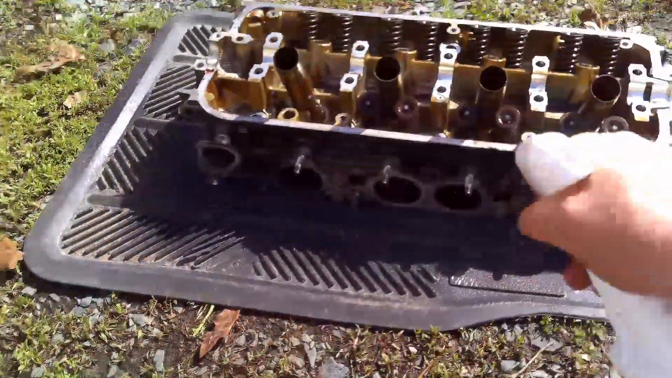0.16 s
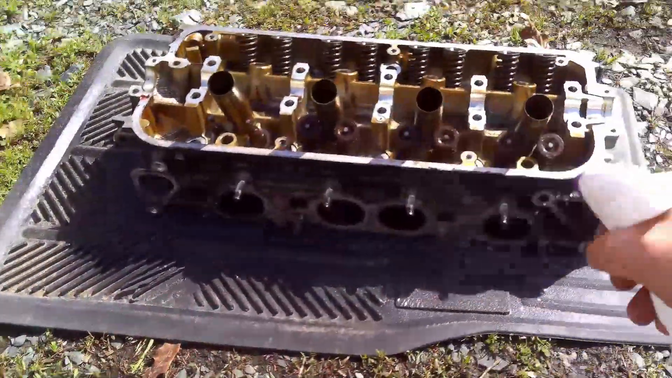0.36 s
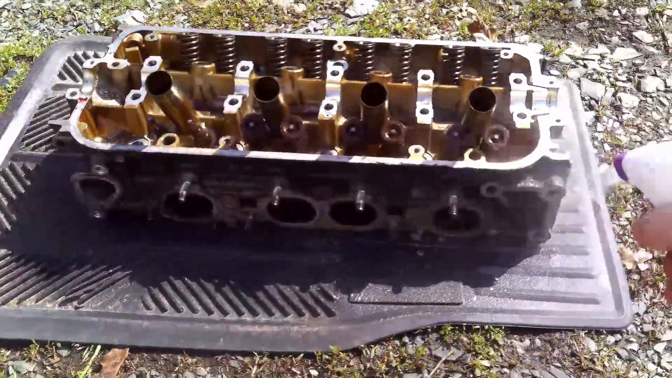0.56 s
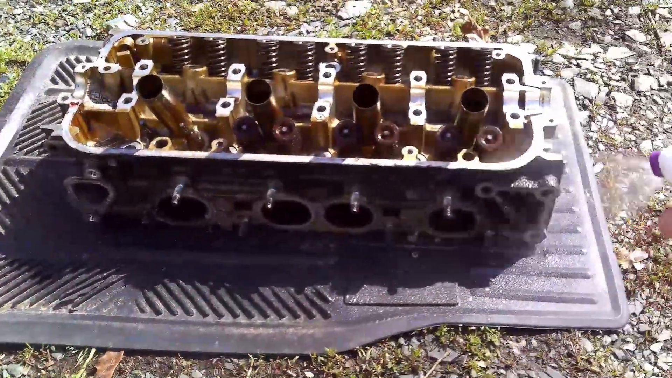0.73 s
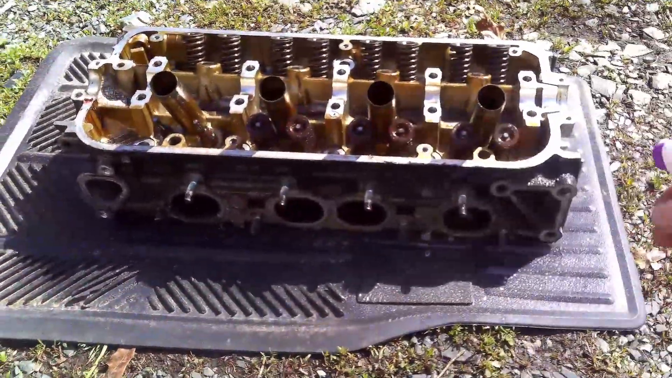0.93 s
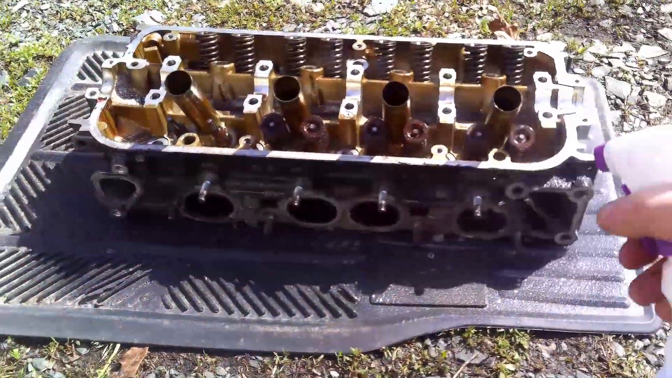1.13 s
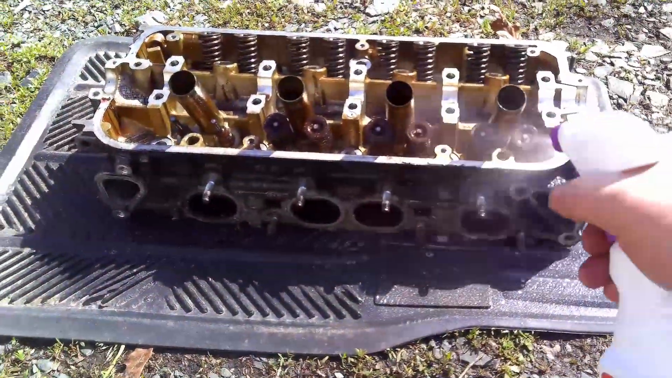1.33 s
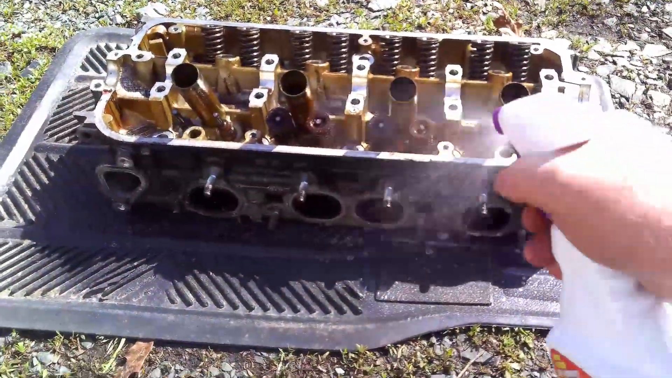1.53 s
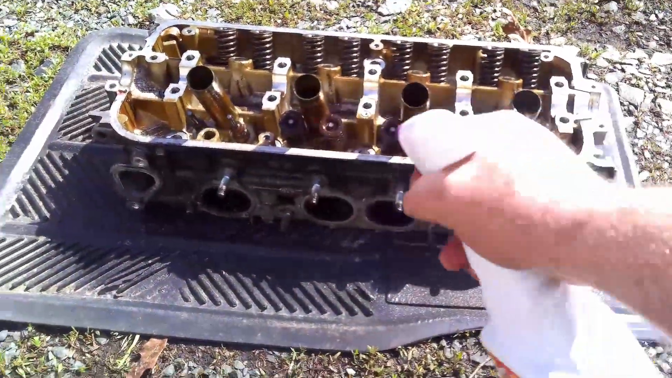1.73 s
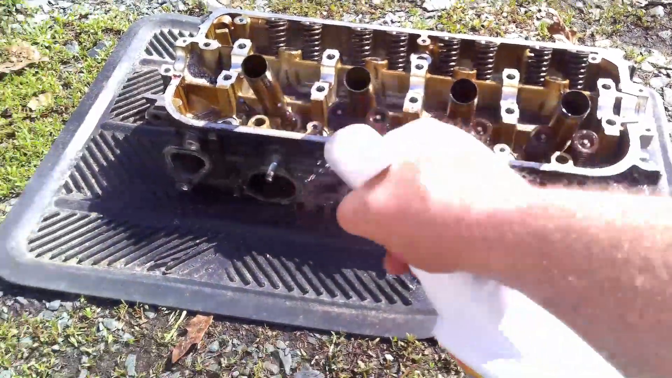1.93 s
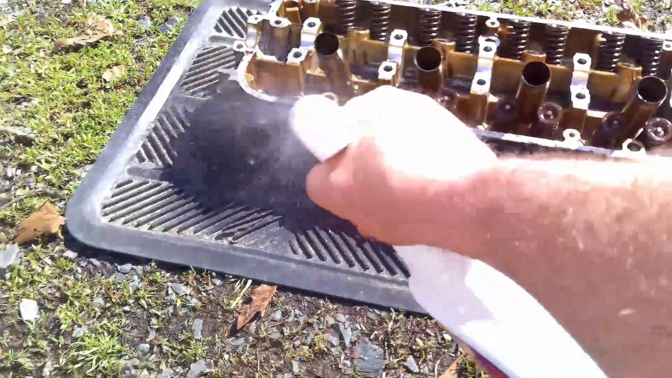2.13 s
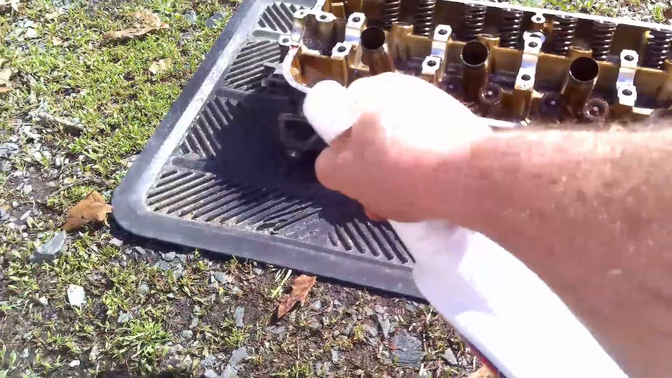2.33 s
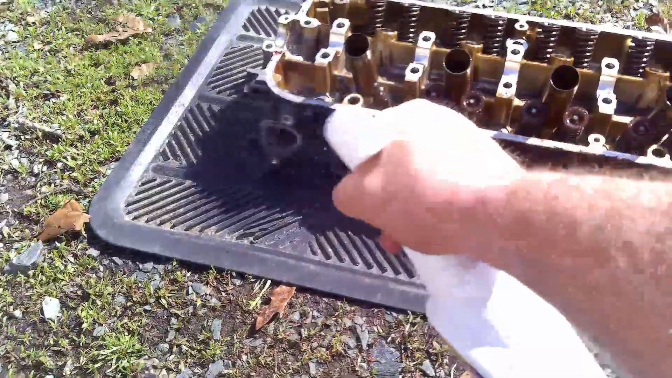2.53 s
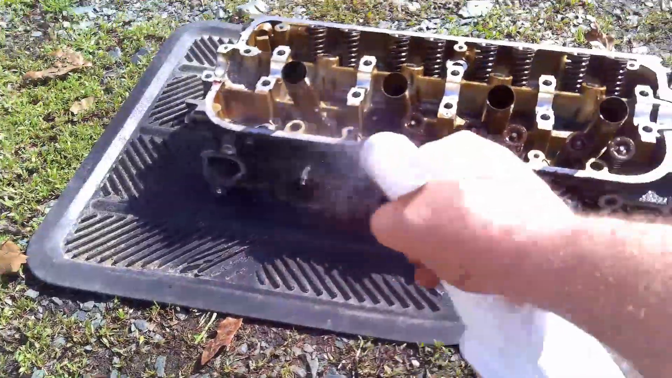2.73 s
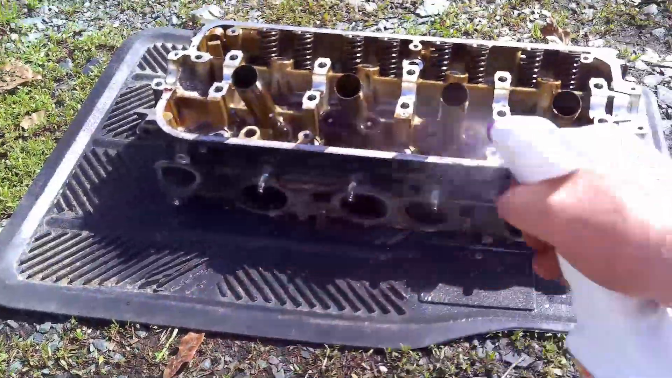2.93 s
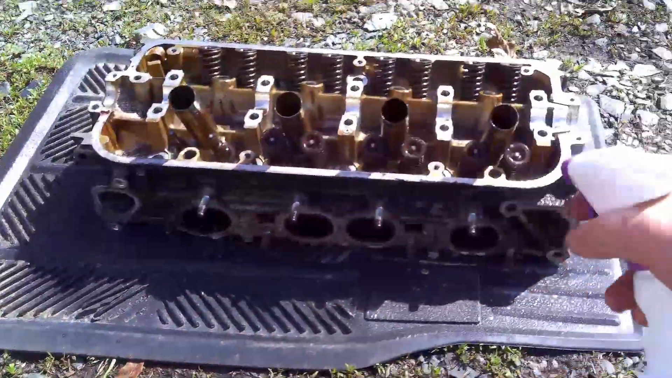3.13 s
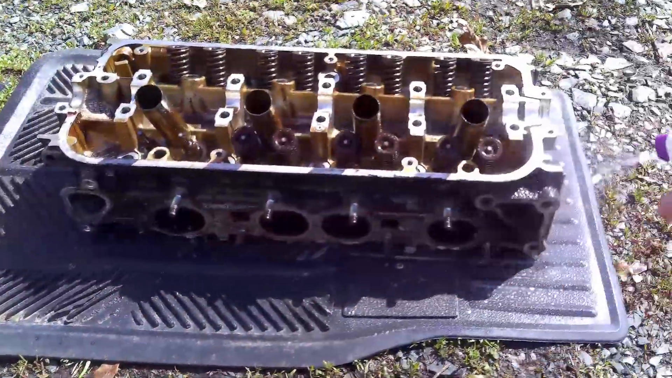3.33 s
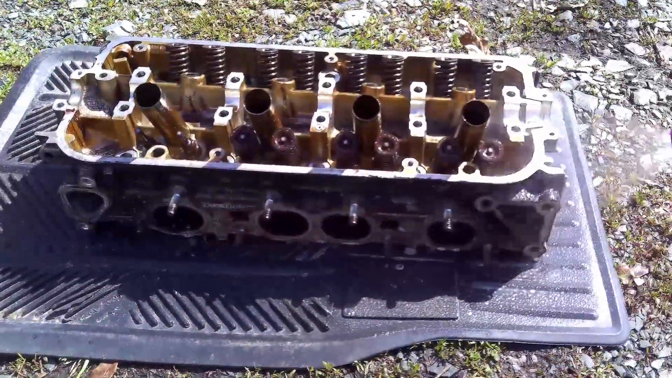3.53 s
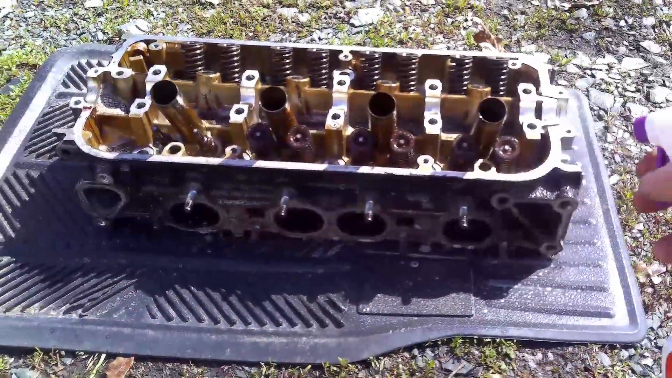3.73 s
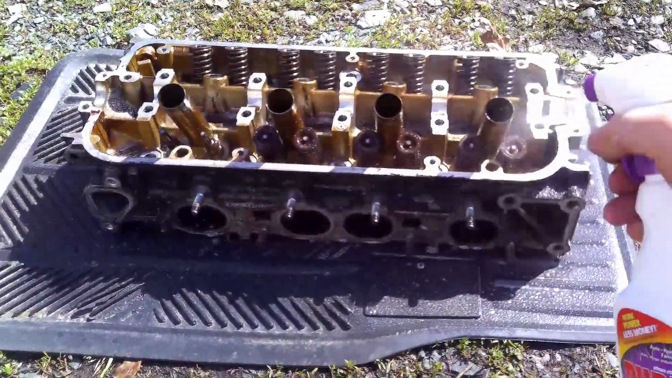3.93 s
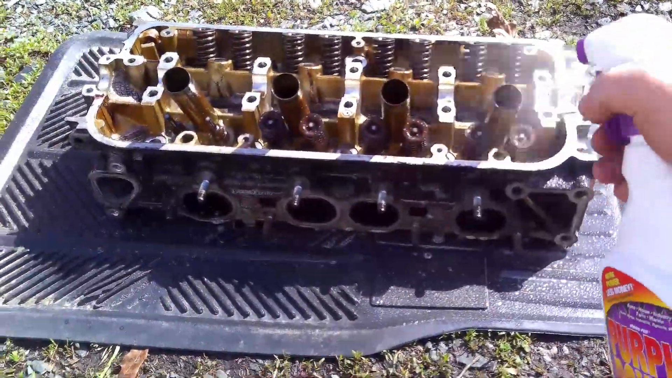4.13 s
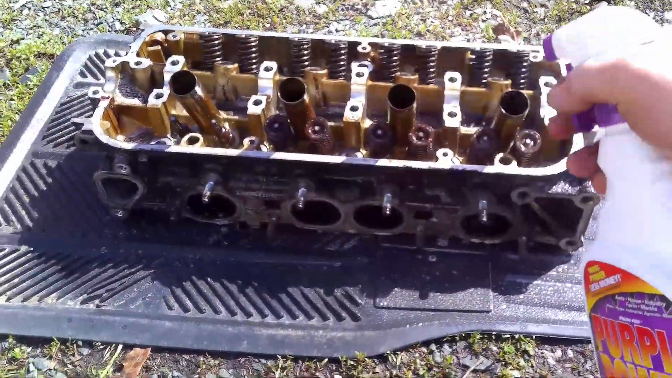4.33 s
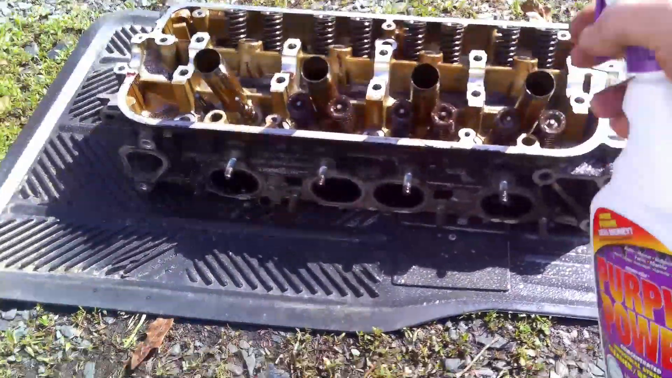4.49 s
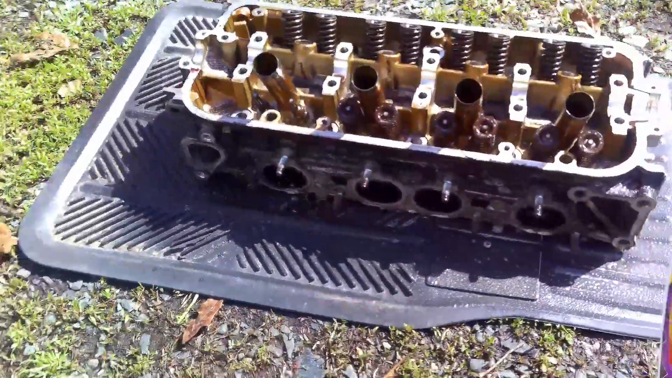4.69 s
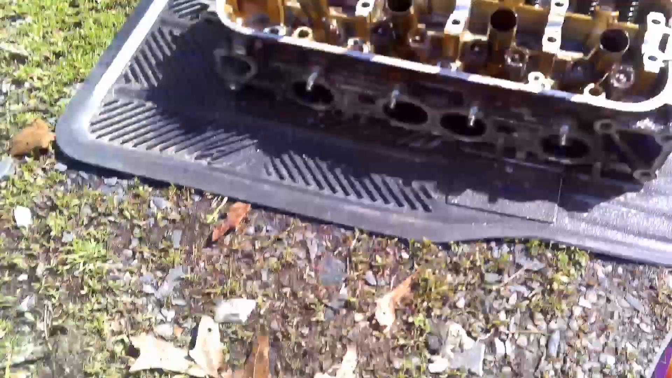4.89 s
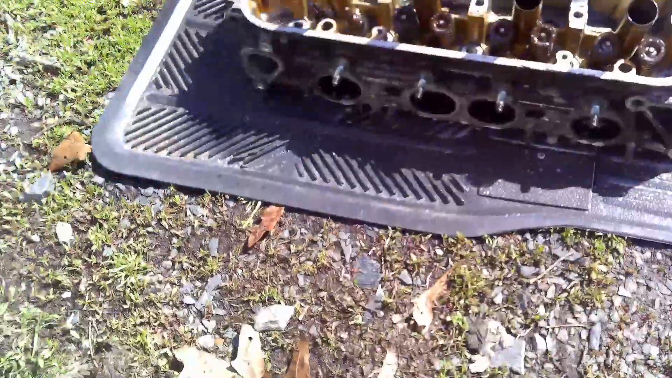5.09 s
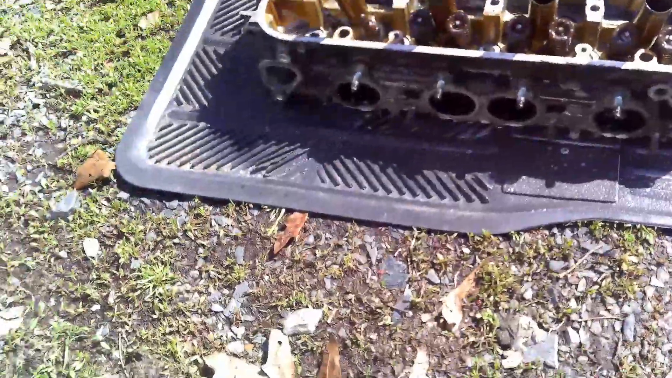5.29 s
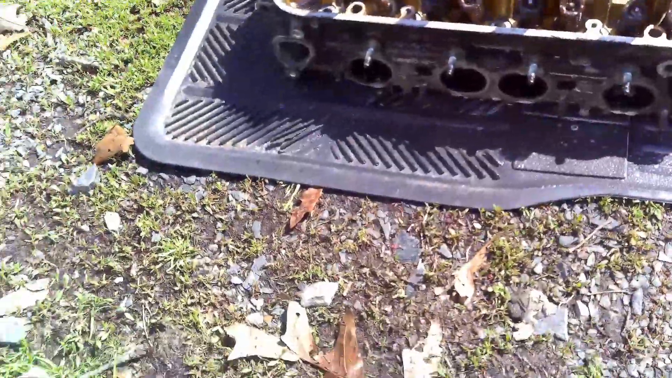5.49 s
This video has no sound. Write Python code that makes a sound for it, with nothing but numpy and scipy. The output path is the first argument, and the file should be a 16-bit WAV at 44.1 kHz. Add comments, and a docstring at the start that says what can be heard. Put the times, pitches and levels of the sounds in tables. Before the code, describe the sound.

Rapid wet squirts of a spray bottle, roughly four a second at first and slowing slightly, hiss near the microphone with rattly plastic trigger clicks between them. The spraying stops after four seconds with coarse drops on metal; then come a thin bird whistle, small glugs and a gritty footstep on stones. Outdoor air, soft wind and a far low engine hum lie beneath, left channel only.

```python
"""In a yard, a trigger spray bottle is pumped sixteen times at a metal engine part, close to one microphone.
The tail of an earlier squeeze opens the scene. Each squeeze is a swell of noise (mist) and random grains
(droplets); between squeezes the plastic trigger clacks as noise bursts in resonators and the pump refills
with a hiss. Then a bird whistles faintly (gliding sine), liquid glugs (decaying sines) and a shoe shifts on
gravel (grains and snaps). A far engine hums throughout, under filtered noise for open air and wind."""
import sys
import numpy as np
from scipy import signal
from scipy.fft import rfft, irfft, next_fast_len
from scipy.io import wavfile
from scipy.ndimage import map_coordinates

SR = 44100
rng = np.random.default_rng(int(sys.argv[2]) if len(sys.argv) > 2 else 0)


def transcribe(signal):
    """Save signal, clipped to [-1, 1], as a 16-bit WAV file at the path in sys.argv[1]."""
    frames = np.atleast_2d(signal).T
    limited = np.clip(frames, -1, 1)
    pcm = np.round(limited * 32767).astype(np.int16)
    wavfile.write(sys.argv[1], SR, pcm)


N = 244755
TIME = np.arange(N) / SR

# Pump strokes. Each row: full flow in seconds, spray level in dB, body tilt in dB, hiss tilt in dB,
# trigger release in seconds, refill level in dB before the trims of each layer.
STROKES = [(-.14, -25, 1, 0, -.018, -34), (.103, -25.5, 2.5, -.5, .243, -34),
           (.347, -23.5, 1, 0, .481, -36.5), (.583, -23.5, .5, -1, .716, -40),
           (.84, -23.5, .5, -1, .982, -36), (1.096, -24.5, 2, 1, 1.241, -35),
           (1.357, -25, 1.5, 2.5, 1.506, -36.5), (1.62, -24, 1, 1, 1.77, -41.5),
           (1.908, -23.5, 0, -2, 2.055, -42.5), (2.192, -25.5, 1.5, -1, 2.348, -45),
           (2.478, -27.5, 4.5, .5, 2.632, -41.5), (2.761, -24.5, 1.5, -1.5, 2.9, -41),
           (3.031, -25, 2, 0, 3.188, -41), (3.333, -23, -.5, -2.5, 3.494, -45),
           (3.633, -26, 1.8, 1.7, 3.786, -41), (3.934, -24.5, .8, 1, 4.094, -40.5),
           (4.243, -23.5, 1, .7, 4.403, -41.5)]
# Bright plastic click spectrum. Each row: frequency in Hz, relative density in dB per Hz.
TICK = [(600, -17), (1700, 9), (3500, -2), (5500, 6), (8000, 7), (10000, -11), (13000, -5.5), (15000, -6)]
# The shoe presses and grinds. Each row: centre in seconds, half length in seconds,
# relative grit level in dB, relative scuff level in dB.
PRESSES = [(4.93, .07, -59.5, -57.5), (5.025, .04, -51, -57), (5.118, .034, -42, -47),
           (5.245, .06, -49, -52), (5.385, .04, -57, -55), (5.535, .02, -48, -51)]
REFILL_S = .042  # the piston's way back


def amp(db):
    """Decibels to gain."""
    return 10 ** (np.asarray(db) / 20)


def unit(x):
    """x at rms 1."""
    return x / np.sqrt(np.mean(x ** 2) + 1e-20)


def curves(rows):
    """One value per sample for each column after the time."""
    s, *cols = np.transpose(rows)
    return [np.interp(TIME, s, c) for c in cols]


def wobble(rate):
    """A smooth random curve with rate knots a second."""
    knots = rng.standard_normal(int(N * rate / SR) + 4)
    return map_coordinates(knots, [TIME * rate])


def colour(x, points):
    """Causal minimum-phase filter through (Hz, dB) points on a log axis."""
    size = 2 * next_fast_len(len(x) // 2 + 1024)
    hz, db = np.transpose(points)
    bins = np.fft.rfftfreq(size, 1 / SR) + 1  # 1 Hz up, to keep the log finite
    gain = amp(np.interp(np.log(bins), np.log(hz), db))
    # folding the cepstrum puts all the energy after the impact
    cepstrum = irfft(np.log(gain))
    cepstrum[1:size // 2] *= 2
    cepstrum[size // 2 + 1:] = 0
    response = np.exp(rfft(cepstrum))
    return irfft(rfft(x, size) * response)[:len(x)]


def resonate(x, hz, width_hz):
    """One damped resonance."""
    return signal.lfilter(*signal.iirpeak(hz, hz / width_hz, SR), x)


def noise(points):
    """Coloured noise of rms 1."""
    return unit(colour(rng.standard_normal(N), points))


def grains(rate, spread_db, points):
    """Random tiny impacts, about rate a second and of uneven size, at rms 1."""
    hits = rng.random(N) < rate / SR
    sizes = amp(spread_db * np.clip(rng.standard_normal(N), -2, 2))
    return unit(colour(hits * rng.choice([-1, 1], N) * sizes, points))


def add(track, s, sound):
    """Mix a sound into the track at time s."""
    start = round(s * SR)
    sound, start = sound[max(-start, 0):], max(start, 0)
    track[start:start + len(sound)] += sound[:max(N - start, 0)]


def swells(rows):
    """Gain over time of bell-shaped swells given as (s, half length s, dB)."""
    return sum(amp(db) * np.exp(-((TIME - s) / half) ** 2) for s, half, db in rows)


def yard(base_hz=68.8, engine_db=7.5, overtone_db=-6, breeze_db=-72, gust_db=6, ambience_db=10):
    """Light wind on the microphone, open air and the hum of a far engine on two unsteady harmonics."""
    # Slow bed levels. Each row: time in seconds, ambience and engine hum in dB before trim.
    beds = [(0.0, -61, -70), (0.91, -62, -61), (1.07, -60, -72), (1.95, -64, -66), (4.27, -61, -68),
            (4.58, -68, -70), (5.19, -64, -67), (5.55, -68, -73)]
    # Gusts on the microphone. Each row: centre in seconds, half length in seconds, level in dB before trim.
    gusts = [(2.8, .02, -56), (4.6, .4, -69), (5.49, .07, -57.5)]
    # Open-air spectrum. Each row: frequency in Hz, relative density in dB per Hz.
    air = [(90, -6), (160, 2), (230, 0), (330, -5.5), (600, -2.5), (1200, -8), (2400, -10.5), (5000, -12),
           (8000, -21.5), (10500, -20.5), (15700, -18.5)]
    # Wind rumble spectrum. Each row: frequency in Hz, relative density in dB per Hz.
    rumble = [(15, 1.5), (35, -1), (80, -5.5), (200, -13), (800, -86)]
    air_db, hum_db = curves(beds)
    phase = 2 * np.pi * np.cumsum(base_hz * (1 + 0.0134 * wobble(6))) / SR
    second = amp(1.2 * wobble(7)) * np.sin(2 * phase)
    third = amp(2 * wobble(5)) * np.sin(3 * phase)
    hum = amp(hum_db + engine_db) * (second + amp(overtone_db) * third)
    wind = amp(gust_db) * (amp(breeze_db) + swells(gusts)) * noise(rumble)
    return hum + wind + amp(air_db + ambience_db) * noise(air)


def rustle():
    """A soft low rustle under the spraying: noise around 360 Hz in slow swells."""
    # Rustle swells. Each row: centre in seconds, half length in seconds, level in dB.
    rustle_swells = [(2.58, .09, -57), (4.05, .22, -55)]
    return swells(rustle_swells) * noise([(150, -22), (270, -5.5), (360, 0), (450, -8), (700, -24), (2000, -62)])


def bird(start_s=4.522, length_s=.135, base_hz=3780, arch_hz=830, level_db=-62, waver=.0077):
    """One thin, faint whistle: pitch and loudness rise and fall in one arch."""
    arch = np.sin(np.pi * np.clip((TIME - start_s) / length_s, 0, 1))
    hz = (base_hz + arch_hz * arch) * (1 + waver * wobble(200))
    return amp(level_db) * arch * np.sin(2 * np.pi * np.cumsum(hz) / SR)


def pebbles(count=2, over_grit_db=17, thud_db=-9, scatter_db=2, centre_hz=7000, spread_hz=700):
    """Small stones, as rows like the loud ones, give way at random around each press of the shoe."""
    rows = []
    for s, half, grit_db, _ in PRESSES:
        for _ in range(count):
            at = s + half * rng.uniform(-1, 1)
            db = grit_db + over_grit_db + scatter_db * rng.standard_normal()
            rows.append((at, db, thud_db, centre_hz + spread_hz * rng.uniform(-1, 1)))
    return rows


def gravel(snap_s=0.00098, snap_db=0, thud_db=3.3, delay_s=.0009, ring_db=-4, grit_db=-1, scuff_db=2.5):
    """Stones slip against each other as short ringing snaps over a bed of crunching grit."""
    # The loudest stones under the shoe. Each row: time in seconds, relative level in dB,
    # low thud in dB before trim, ring in Hz.
    stones = [(4.548, -41.5, -8.5, 4500), (4.991, -25, -30, 7000), (5.02, -12, -7, 4970),
              (5.065, -30, -14, 7160), (5.101, -13, -13, 4750), (5.105, -20, -12, 6300),
              (5.1283, -21, -13, 7100), (5.1574, -20.5, -20, 4930), (5.1962, -23, -20, 3600),
              (5.2124, -19.5, -21, 6750), (5.2396, -16.5, -18, 6500), (5.2612, -23.5, -7.5, 2600),
              (5.2929, -28, -19, 7200), (5.3226, -26, -29, 6530), (5.3728, -27, -9, 7500),
              (5.3813, -24, -10.5, 4800), (5.5269, -23, -23, 7800)]
    # Stone crunch spectrum. Each row: frequency in Hz, relative density in dB per Hz.
    crunch = [(500, -22), (2000, -3.5), (3500, 1), (5000, 5.5), (6500, 5.5), (8000, 3.5), (10000, -7),
              (15700, -22)]
    # Dull sole scuff spectrum. Each row: frequency in Hz, relative density in dB per Hz.
    sole = [(200, -20), (600, 2), (1300, 0.5), (2000, 0), (3000, -2.5), (6000, -19)]
    grit = swells([(s, half, db) for s, half, db, _ in PRESSES])
    scuff = swells([(s, half, db) for s, half, _, db in PRESSES])
    out = amp(grit_db) * grit * grains(900, 2.1, crunch)
    out += amp(scuff_db) * scuff * grains(700, 2.8, sole)
    t = np.arange(SR // 40) / SR
    for s, db, low_db, ring_hz in stones + pebbles():
        slip = rng.standard_normal(len(t)) * (np.exp(-t / snap_s) + 0.11 * np.exp(-t / 0.0061))
        stone = unit(colour(slip, crunch)) + amp(ring_db) * unit(resonate(slip, ring_hz, 440))
        thud = amp(thud_db + low_db) * unit(colour(slip, sole))
        add(out, s + delay_s, amp(db - 21.5) * (amp(snap_db) * unit(stone) + thud))
    return out


def glugs(attack_s=0.00043, count=6, bubble_db=-39.5, bubble_t60=.04, bubble_hz=1280, spread_hz=50):
    """Air pockets ring as decaying sines when the liquid swings in the bottle."""
    # Single glugs. Each row: time in seconds, pitch in Hz, level in dB, 60 dB decay time in seconds.
    air_pockets = [(4.569, 490, -36, .039), (4.622, 430, -42, .1), (4.641, 1320, -45, .03),
                   (5.261, 1305, -27, .031)]
    out, t = np.zeros(N), np.arange(SR // 8) / SR
    # a run of small bubbles around the last glug
    gurgle_s, gurgle_length_s = 5.215, .085
    times = gurgle_s + gurgle_length_s * (np.arange(count) + rng.random(count)) / count
    gurgle = [(s, bubble_hz + spread_hz * rng.standard_normal(), bubble_db, bubble_t60) for s in times]
    for s, hz, db, t60 in air_pockets + gurgle:
        decay = amp(db - 60 * t / t60)
        add(out, s, decay * np.sin(2 * np.pi * hz * t) * (1 - np.exp(-t / attack_s)))
    return out


def creak(level_db=-12.5, half_s=.028, after_s=.008, rough_db=3, spread=.035):
    """The piston seal rubs along its bore on the way back and rings the head, a little differently each time."""
    # Modes of the hollow head. Each row: frequency in Hz before the pitch scatter, width in Hz,
    # relative level in dB.
    modes = [(1170, 70, 0), (2500, 130, -5)]
    out, t = np.zeros(N), np.arange(SR // 5) / SR
    middle = t.mean()
    for *_, s, db in STROKES:
        pitch = 1 + spread * rng.standard_normal()
        ring = np.zeros(len(t))
        for hz, width, mode_db in modes:
            narrow = resonate(rng.standard_normal(len(t)), hz * pitch, width)
            ring += amp(mode_db) * unit(resonate(narrow, hz * pitch, 4 * width))
        rub = amp(db + level_db) * np.exp(-((t - middle) / half_s) ** 2)
        add(out, s + after_s - middle, rub * ring)
    return out * amp(rough_db * wobble(70))


def refills(attack_s=0.0025, fade_db=6, level_db=-2, bubbles_db=-7):
    """Liquid and tiny bubbles hiss through the inlet valve until the piston reaches its stop."""
    # Inlet hiss spectrum. Each row: frequency in Hz, relative density in dB per Hz.
    inlet = [(300, -45), (800, -10.5), (1150, 14), (1600, 3.5), (2550, 12.5), (3100, 4.5), (4300, 11.5),
             (6500, 5), (8000, 7), (10000, -3), (15700, -5)]
    suction, t = np.zeros(N), np.arange(SR // 8) / SR
    closing = np.clip((REFILL_S - t) / 0.011 + .5, 0, 1)
    for *_, s, db in STROKES:
        add(suction, s, amp(db - fade_db * t / REFILL_S) * (1 - np.exp(-t / attack_s)) * closing)
    liquid = noise(inlet) + amp(bubbles_db) * grains(350, 6, inlet)
    hiss = suction * amp(0.72 * wobble(110)) * liquid
    return amp(level_db) * (hiss + .5 * resonate(hiss, 1540, 110) + 0.71 * resonate(hiss, 2530, 170))


def rattles(count=4, knock_db=-7, shell_db=-7, tick_db=-7, scatter_db=3, brisk_db=-38, knock_growth=.6):
    """Faint contacts, as rows like the loud clacks, spread over each release; a brisk one knocks harder."""
    from_s, to_s = -.012, .042  # the loose trigger rattles around each release
    rows = []
    for *_, s, db in STROKES:
        times = s + from_s + (to_s - from_s) * (np.arange(count) + rng.random(count)) / count
        mix_db = np.array([knock_db + knock_growth * (db - brisk_db), shell_db, tick_db])
        levels = db + mix_db + scatter_db * rng.standard_normal((count, 3))
        rows += [(at, *level) for at, level in zip(times, levels)]
    return rows


def trigger(slip_s=0.002, contact_s=0.0023, knock_db=14, shell_db=12, tick_db=9, ring_s=0.0039, chatter=0.7):
    """The piston sticks and slips: each short rattle rings the hollow plastic head."""
    # The loud clacks of the loose trigger. Each row: time in seconds, then knock, shell and tick
    # levels in dB before trim.
    clacks = [(.1904, -47, -39, -33.5), (.2421, -34, -33, -33), (.2545, -25, -26, -26),
              (.2651, -31, -37, -22), (.2731, -19.5, -36, -31), (.4722, -37.5, -53, -43),
              (.508, -39, -37, -43), (.746, -31.5, -41, -23.5), (.7592, -33, -29, -22.5),
              (.7639, -23.5, -29, -27), (.983, -34, -32.5, -34), (1.0, -24.5, -21, -17),
              (1.0096, -24, -41, -23), (1.0137, -27, -24, -19.5), (1.2246, -37.5, -38, -43),
              (1.2762, -27.5, -27, -23), (1.5014, -37, -32, -37.5), (1.5131, -25.5, -24.5, -26),
              (1.538, -28.5, -40, -31.5), (2.9128, -35.5, -50, -35), (2.9464, -41, -39, -34),
              (3.2375, -30, -31, -32.5), (3.528, -50, -35.5, -50), (3.8, -37.5, -27, -38),
              (3.8287, -33, -36, -33.5), (3.8339, -34, -35, -38), (4.145, -31, -36.5, -33.5),
              (5.272, -48, -35, -52)]
    out, t = np.zeros(N), np.arange(SR // 25) / SR
    contact = np.exp(-((t - slip_s) / contact_s) ** 2) + 0.16 * np.exp(-t / 0.009)
    burst = contact * (1 - np.exp(-t / 0.0009))
    for s, knock, shell, tick in clacks + rattles():
        low, mid, high = rng.standard_normal((3, len(t))) * burst
        cavity_hz = rng.normal(1136, 43)
        thump = np.sin(2 * np.pi * cavity_hz * t) * np.exp(-t / ring_s) * (1 - np.exp(-t / 0.0011))
        cavity = unit(thump) + chatter * unit(resonate(resonate(low, cavity_hz, 750), 1720, 1800))
        wall = resonate(resonate(mid, rng.normal(2620, 260), 600), 2030, 1800)
        parts = amp(knock + knock_db) * unit(cavity)
        parts += amp(shell + shell_db) * unit(wall)
        parts += amp(tick + tick_db) * unit(colour(high, TICK))
        add(out, s, amp(-24.5) * parts)
    return out


def spits():
    """The outlet valve pops open now and then: a short wet puff through the nozzle just ahead of the jet."""
    # Puffs. Each row: centre in seconds, half length in seconds, level in dB.
    puffs = [(2.1195, .004, -40), (2.686, .004, -38)]
    return swells(puffs) * noise([(500, -14), (2000, 0), (4000, -7), (7800, 0), (10000, -12), (15700, -18)])


def spatter(ring_s=0.00047):
    """The last squeeze ends in a splash of coarse drops that tap on the metal."""
    # Splash swell. Each row: centre in seconds, half length in seconds, level in dB.
    splash_swells = [(4.296, .035, -29.5)]
    # Big drops on metal. Each row: time in seconds, relative level in dB.
    taps = [(4.2695, -15), (4.288, -19), (4.2945, -19), (4.356, -27)]
    splash = [(2000, -38), (5000, -8), (6300, 6.5), (7400, 4.5), (10000, -4.5), (15000, -27)]
    out = swells(splash_swells) * grains(1300, 3, splash)
    t = np.arange(SR // 100) / SR
    for s, db in taps:
        tap = rng.standard_normal(len(t)) * np.exp(-t / ring_s)
        add(out, s, amp(db - 14) * unit(colour(tap, splash)))
    return out


def echoes(x, share=0.12, count=8):
    """Small near faces of the casting reflect the short waves within milliseconds."""
    highpass = signal.butter(1, 1200, "highpass", fs=SR, output="sos")
    out, short = x.copy(), signal.sosfilt(highpass, x)
    lags = rng.integers(SR // 4000, SR // 300, count)
    for lag, sign in zip(lags, rng.choice([-1, 1], count)):
        out[lag:] += share * sign * short[:-lag]
    return out / np.sqrt(1 + count * share ** 2)


def spray(steepness=2.35, mist_db=-3.7, drops_db=-8.6, sputter_db=1.08, head_db=-17, squeak_db=-49,
          spit_db=-52, fizz_db=-1, open_s=.008, hurry=3):
    """Each squeeze swells and fades alike; its colour depends on where the jet lands."""
    # Fine mist spectrum. Each row: frequency in Hz, relative density in dB per Hz.
    mist = [(120, -21), (400, -14), (580, -4.5), (790, -3), (1100, -0.5), (2000, 0.5), (3300, 1),
            (5000, 2.5), (6000, 4), (8000, -1), (10000, 0), (12000, -5), (15700, -15)]
    # Droplet spectrum. Each row: frequency in Hz, relative density in dB per Hz.
    droplets = [(500, -19.5), (3000, -3.5), (6000, -8), (7800, 6.5), (10000, -3), (15700, -1.5)]
    rise_s, fall_s = .069, .085  # the flow swells and fades by 20 dB in these times
    valve_lead = .26  # the outlet valve opens this share of a stroke before full flow
    head = unit(resonate(noise(mist), 2580, 180))  # the jet rings the hollow spray head
    jet = amp(mist_db) * noise(mist) + amp(drops_db) * grains(1200, 4, droplets) + amp(head_db) * head
    breakup = sputter_db * wobble(170) + 0.26 * wobble(45)  # the liquid sheet breaks up unevenly, in dB
    squeak = amp(squeak_db) * unit(resonate(resonate(noise(mist), 2020, 300), 1830, 600))
    squeak += amp(spit_db) * noise(TICK)
    periods = np.gradient([stroke[0] for stroke in STROKES])
    out = np.zeros(N)
    for (s, db, body_db, hiss_db, _, _), period in zip(STROKES, periods):
        opens = s - valve_lead * period
        span = (TIME >= opens) & (TIME < s + .2)
        t, age = TIME[span] - s, TIME[span] - opens
        flow = amp(-20 * np.abs(t / np.where(t < 0, rise_s, fall_s)) ** steepness)
        settling = amp(-16.5 - 127 * np.abs(t)) * (t > 0)  # slow droplets land after the main swell
        sputter = amp(breakup[span] * (1 + 0.8 * (1 - flow)))  # a weak jet is more ragged
        aim = [(1600, body_db), (4700, hiss_db), (7800, 0), (12000, hiss_db + fizz_db)]
        opening = 1 - np.exp(-age / open_s)
        landing = colour(jet[span] * sputter * opening * np.hypot(flow, settling), aim)
        out[span] += amp(db) * echoes(landing)
        # the outlet valve squeaks open, louder in haste
        valve = np.exp(-(age / .02) ** 2)
        out[span] += squeak[span] * valve * (periods.mean() / period) ** hurry
    return out


def scene():
    """Everything reaches one microphone."""
    surroundings = yard() + rustle() + bird() + gravel()
    pump = glugs() + creak() + refills() + trigger() + spits() + spatter() + spray()
    return (surroundings + pump)[None]


def record(dry):
    """The microphone colours the sound, passes nothing above its top, and feeds the left channel only."""
    # The microphone port rings near 8 kHz. Each row: frequency in Hz, gain in dB.
    port = [(5000, 1), (6300, 3), (7200, 11), (7950, 14), (8800, 6.5), (10000, 2), (12000, -1.5),
            (15800, -8)]
    top_hz = 15900
    size = next_fast_len(N + SR // 4)
    passed = np.fft.rfftfreq(size, 1 / SR) < top_hz
    heard = irfft(rfft(colour(dry[0], port), size) * passed, size)[:N]
    return np.array([heard, np.zeros(N)])


dry = scene()
out = record(dry)
transcribe(out)
```